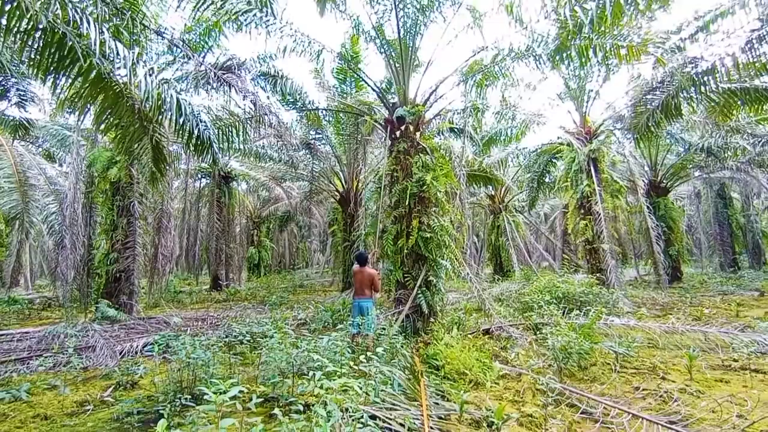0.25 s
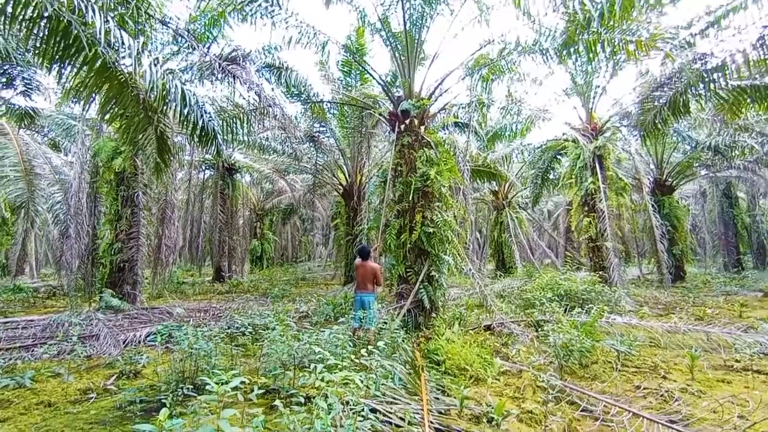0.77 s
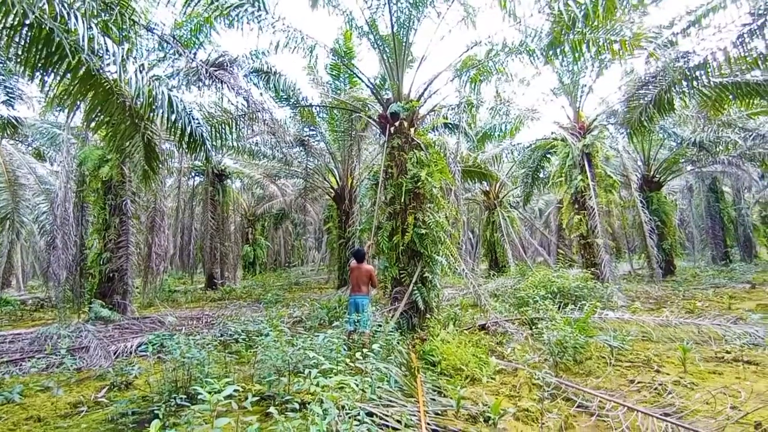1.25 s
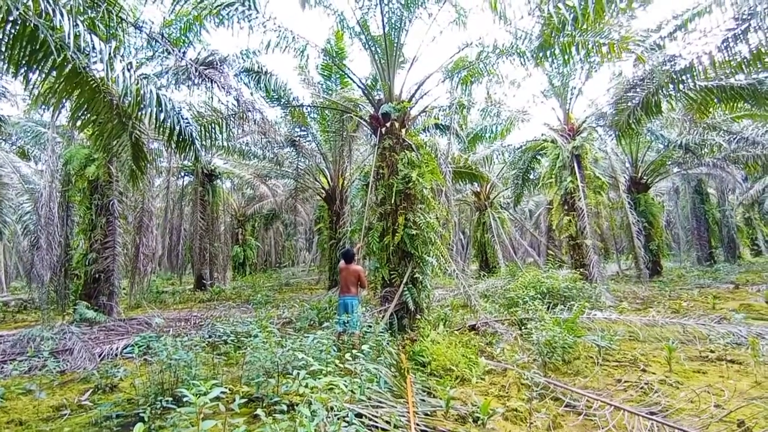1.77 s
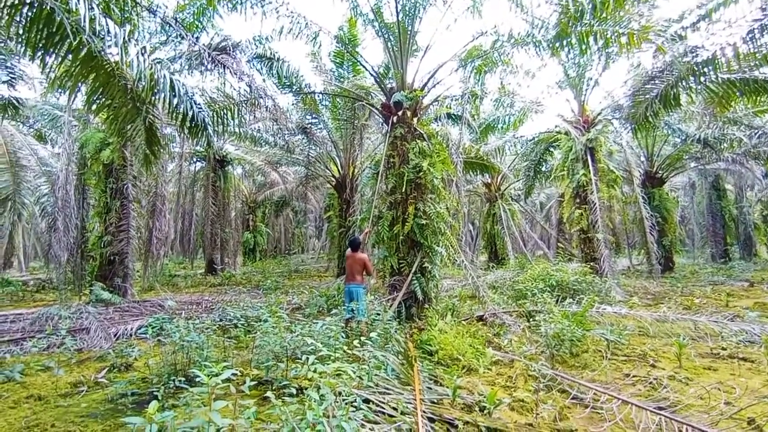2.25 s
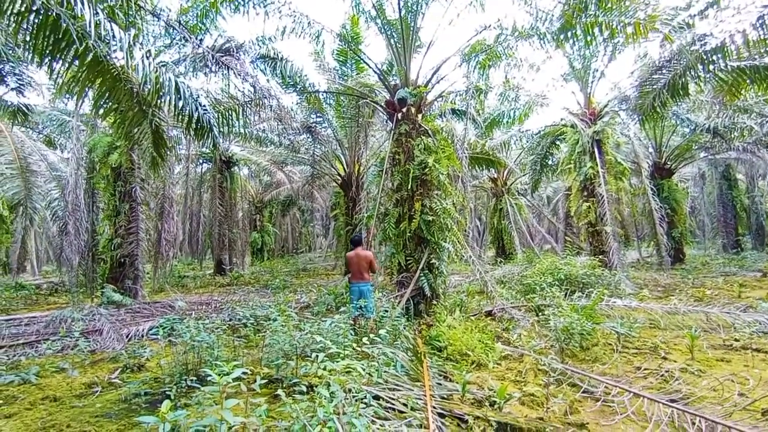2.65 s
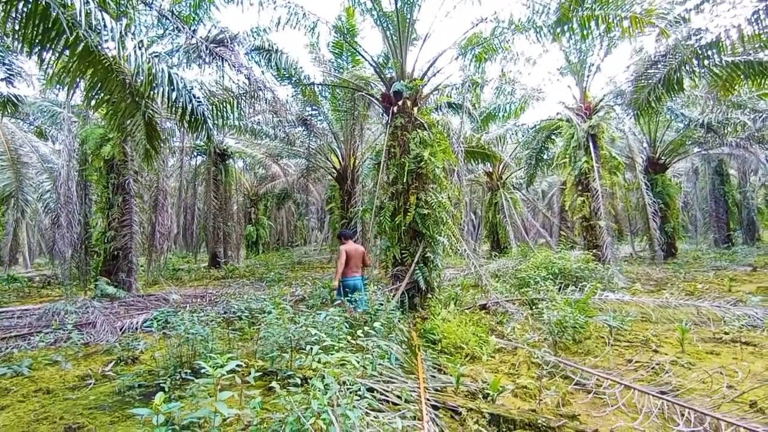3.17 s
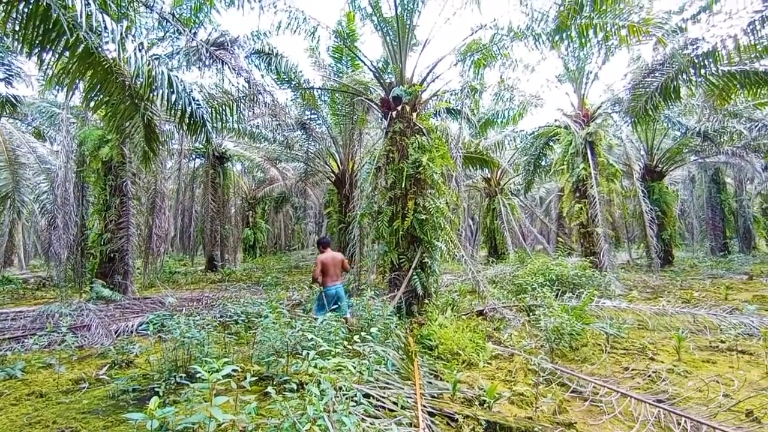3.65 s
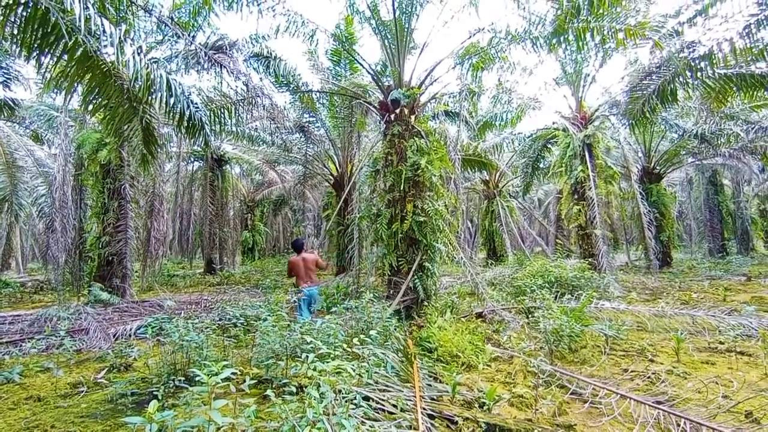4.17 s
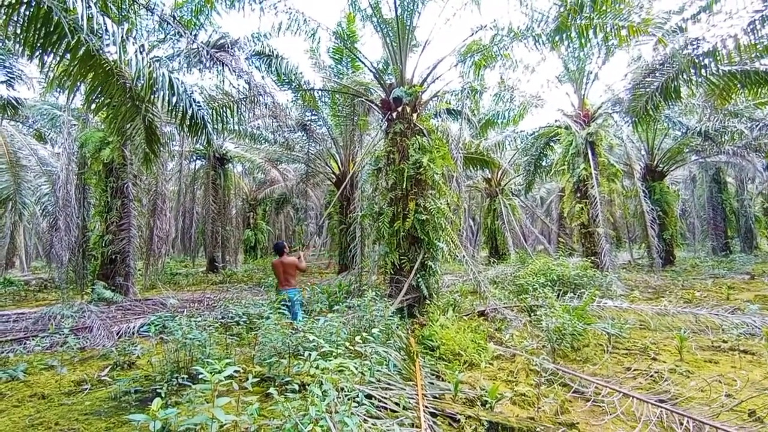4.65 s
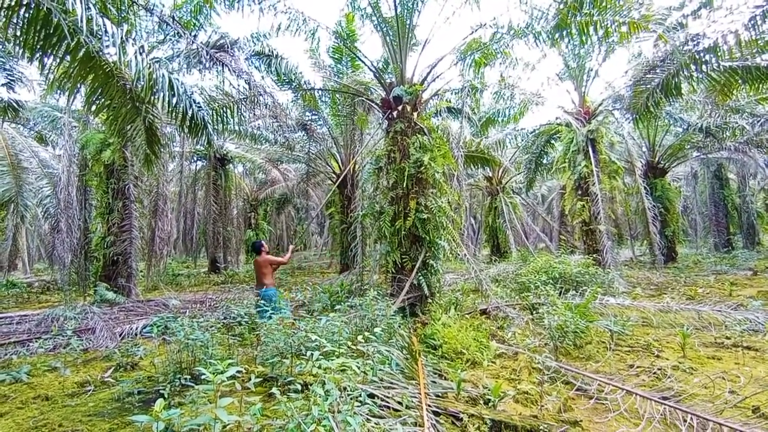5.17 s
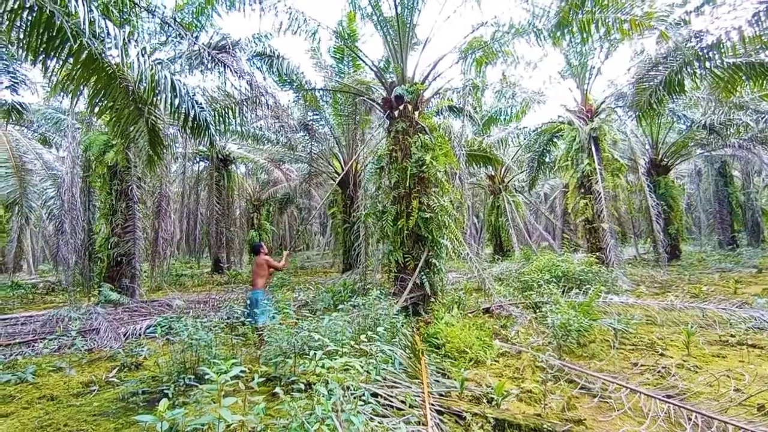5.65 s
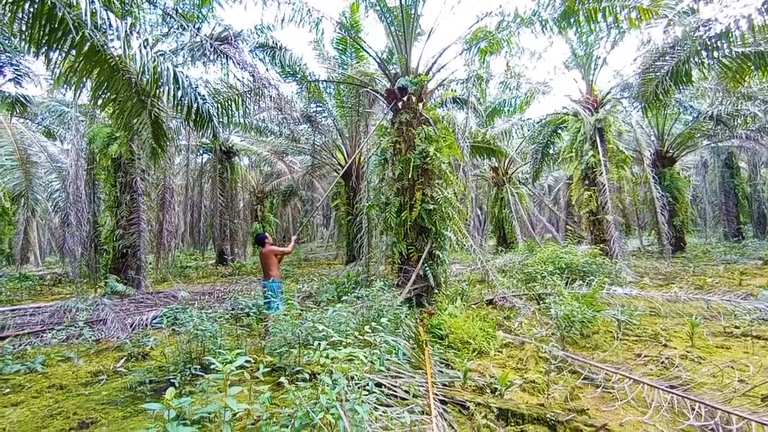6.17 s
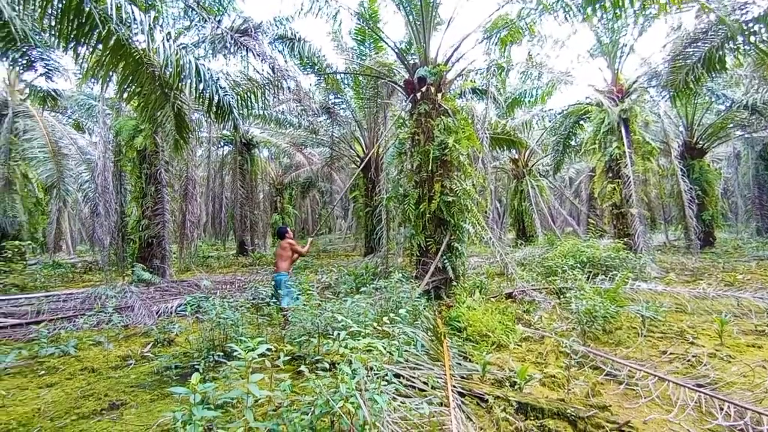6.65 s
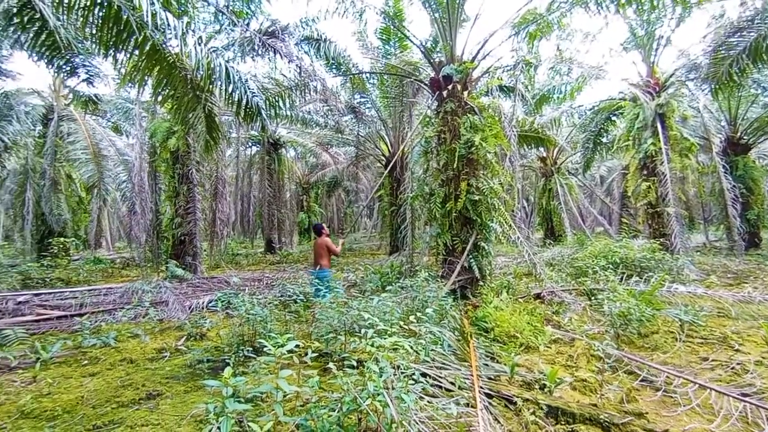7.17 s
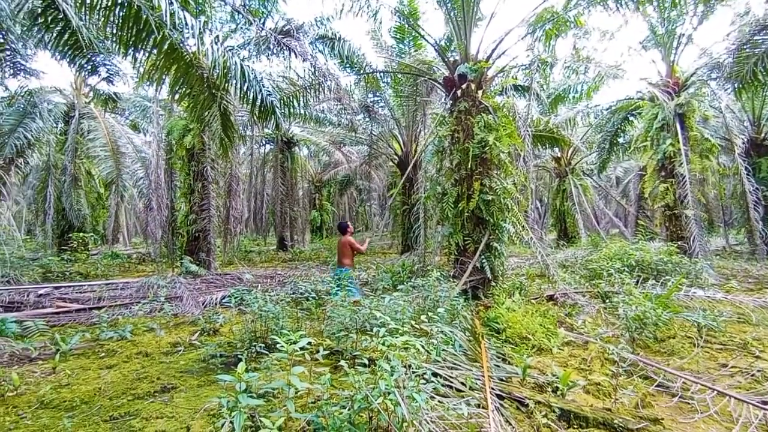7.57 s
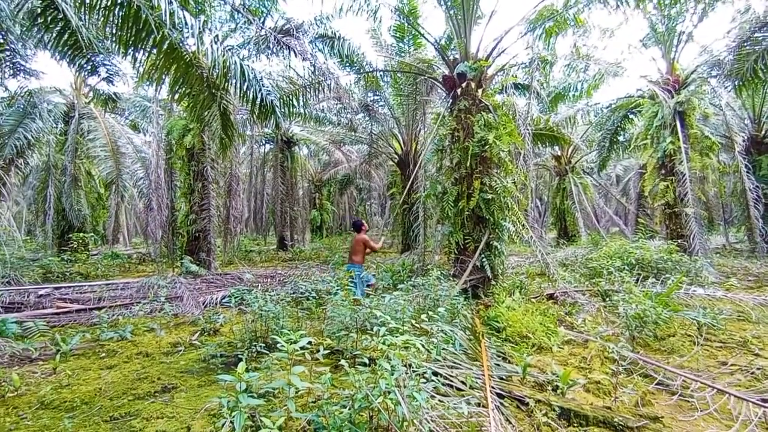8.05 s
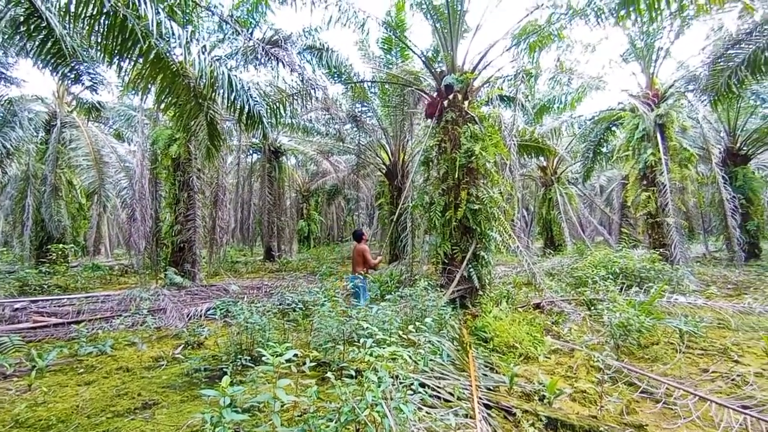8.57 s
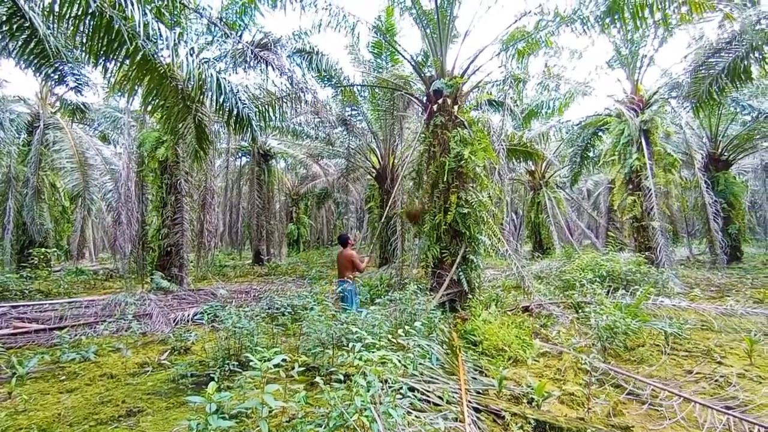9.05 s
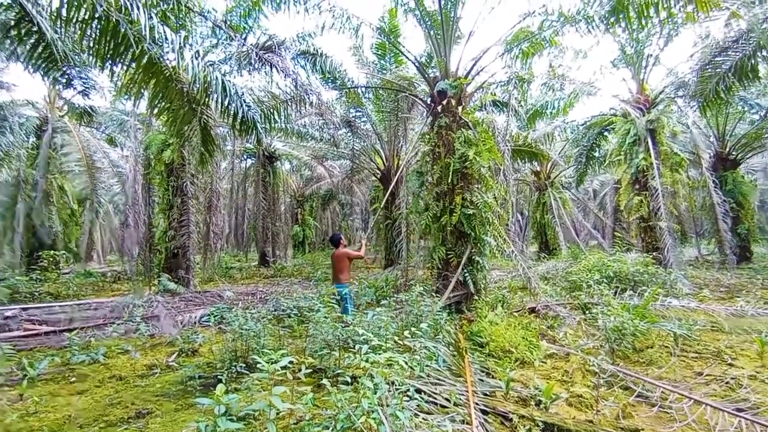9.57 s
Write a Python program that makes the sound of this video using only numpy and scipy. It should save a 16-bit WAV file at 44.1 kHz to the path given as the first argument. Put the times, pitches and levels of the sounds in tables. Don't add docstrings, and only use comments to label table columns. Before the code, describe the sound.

High, fast-throbbing insects and a faint distant rumble fill a palm plantation. Some metres from the stereo phone microphone, a long pole probes dry leaves with small ticks and taps. A frond breaks with a violent crack and long crackle, the pole then jerks and knocks woodily, leaves rustle, and a heavy bunch tumbles through foliage, landing dully near the end. The trunks return a short diffuse echo.

```python
import sys
import numpy as np
from scipy import signal
from scipy.fft import rfft, irfft
from scipy.io import wavfile
from scipy.ndimage import uniform_filter1d, map_coordinates

SR = 44100
rng = np.random.default_rng(int(sys.argv[2]) if len(sys.argv) > 2 else 0)


def boost(x):
    u = np.asarray(x, float) / 20
    return 10 ** u


def materialize(psi):
    bounded = np.clip(np.atleast_2d(psi).T, -1, 1)
    quanta = np.round(bounded * 32767).astype(np.int16)
    wavfile.write(sys.argv[1], SR, quanta)


N = 433042
TIME_S = np.arange(N) / SR
OPPOSED = np.array([[1], [-1]])


def level(x, db):
    return x * boost(db) / np.sqrt(np.mean(x ** 2))


def colour(x, points, size=512):
    hz, db = np.transpose(points)
    bins_hz = np.fft.rfftfreq(size, 1 / SR) + 1
    gain = boost(np.interp(np.log(bins_hz), np.log(hz), db))
    cep = irfft(np.log(gain))
    cep[1:size // 2] *= 2
    cep[size // 2 + 1:] = 0
    taps = irfft(np.exp(rfft(cep)))
    taps = taps.reshape((1,) * (x.ndim - 1) + (-1,))
    return signal.fftconvolve(x, taps)[..., :x.shape[-1]]


def ring(x, hz, width):
    return signal.lfilter(*signal.iirpeak(hz, hz / width, fs=SR), x)


def body(x, modes):
    return sum((-1) ** k * boost(db) * ring(x, hz, width) for k, (hz, width, db) in enumerate(modes))


def band(hz, width):
    return ring(ring(rng.standard_normal((2, N)), hz, width), hz, width)


def walk(rate):
    k = int(SR / rate)
    held = np.repeat(rng.standard_normal(N // k + 1), k)
    return 0.95 * uniform_filter1d(uniform_filter1d(held, k), k)[:N]


def fade(t60, size=4096):
    return 1000. ** (-np.arange(size) / SR / t60)


def grains(count, spread_db, tail_s, apart):
    at, size = rng.random((2, count))
    power = boost(-2 * spread_db * np.log(size + .004))
    hits = np.bincount((at * (N - 1)).astype(int), power, N)
    puff = np.sqrt(signal.lfilter([1], [1, -np.exp(-1 / (tail_s * SR))], hits))
    mid, side = rng.standard_normal((2, N))
    return puff * (mid + apart * side * OPPOSED)


def breaking(t60):
    splinters = rng.standard_normal((2, 4096)) * fade(t60)
    splinters[[0, 1], rng.integers(0, 2, 2)] = 5.5
    return splinters


def strokes(table):
    t = np.arange(0, N / SR, .002)
    power = np.zeros((2, len(t)))
    for s, rise, fall, db, second_db in table:
        away = np.where(t < s, (s - t) / rise, (t - s) / fall)
        shape = boost(db - 20 * away)
        power += shape ** 2 * boost(np.array([[0], [2 * second_db]]))
    return np.array([np.interp(TIME_S, t, np.sqrt(layer)) for layer in power])


def sides(pan_db):
    return boost(np.array([pan_db, -pan_db]) / 2)


def add(out, s, sound, db):
    i = int(s * SR)
    sound = sound[..., :N - i]
    out[:, i:i + sound.shape[-1]] += boost(db) * sound / np.abs(sound).max()


# time_s, left_minus_right_db, left_port_early_ms
BEARING = [
    (0.0, 0, 0.02),
    (2.9, 0, 0.0098),
    (3.72, 0.5, 0.059),
    (5.55, 1, 0.1),
    (5.66, 0.5, .05),
    (6.3, 1, 0.083),
    (7.2, 0, -0.025),
    (8.7, 0, -0.035),
    (9.82, 0.5, -0.022),
]


def bearing(s, axis):
    table = np.transpose(BEARING)
    return np.interp(s, table[0], table[axis])


# pitch_hz, level_db
LEAF = [(2940, -20.5), (5000, -14.5), (7390, -8), (8080, -5), (8840, -2.5), (9330, 2.5), (10500, 2),
        (11800, -4), (15100, -10.5), (16000, -26), (16300, -107.5)]
# pitch_hz, level_db
FROND = [(150, -60), (700, -34), (1300, -12.5), (2000, -5.5), (3400, 0), (5500, -1.5), (7500, -2.5),
         (10000, 1), (16000, -36.5)]
# time_s, level_db
STIR = [(0, -66), (.5, -59.5), (1.34, -57.5), (1.85, -63.5), (2.4, -70.5), (3.36, -60), (4.9, -64.5),
        (5.58, -71), (6.05, -74), (6.5, -60.5), (8.3, -66), (9.82, -51)]
# loudest_s, rise_s and fall_s (over 20 dB), level_db, frond_body_db (against level)
SWEEPS = [(.24, 0.038, 0.061, -44.5, -4), (3.56, 0.24, 0.28, -47.5, -9), (3.66, 0.081, .2, -44.5, -12),
          (3.75, 0.15, 0.27, -39.5, -11.5), (3.84, 0.11, 0.35, -35, -10.5), (4.04, 0.11, 0.52, -47, -9),
          (4.4, .3, 0.91, -54, -9), (2.83, .15, 0.19, -63, -12), (9.28, 0.061, .2, -61, -6),
          (9.43, 0.14, 0.16, -36.5, -9), (3.95, 0.037, 0.095, -35, 1.5), (4.27, 0.061, 0.14, -40, -11),
          (4.54, .2, 0.18, -62, -15), (4.97, .04, 0.13, -58, -4.5), (5.69, 0.08, 0.11, -47, -5.5),
          (6.23, 0.2, 0.3, -57, -3.5), (6.56, 0.072, 0.64, -64, 3), (6.73, 0.019, 0.15, -39.5, -7.5),
          (7.52, 0.36, 1, -54.5, -6.5), (8.15, 0.21, 0.29, -55.5, -5.5), (8.5, 0.16, 0.65, -48.5, -7),
          (9.0, 0.19, 1, -45, -5), (9.52, 0.62, 0.34, -37, -7), (9.82, 0.32, 0.18, -49, -13)]


def leaflets():
    stir = boost(np.interp(TIME_S, *np.transpose(STIR)))
    stir_layers = stir * boost(np.array([[0], [-6]]))
    bright, dull = np.hypot(strokes(SWEEPS), stir_layers)
    tips = grains(count=8000, spread_db=1.9, tail_s=.0012, apart=.7)
    frond = grains(count=5000, spread_db=1.8, tail_s=.0018, apart=.7)
    tips = level(colour(tips, LEAF), 0.63)
    frond = level(colour(frond, FROND), 1.8)
    return sides(bearing(TIME_S, axis=1)) * (bright * tips + dull * frond)


# start_s, peak_db, body_db (against peak)
WORK_SNAPS = [(0.206, -41, -12), (0.2266, -46, 1), (0.421, -36, -3.5), (0.4533, -37, -18),
              (0.613, -42, -1.5), (0.972, -42, 0.5), (1.1264, -38.5, -15), (1.384, -38, -30),
              (1.4428, -33.5, -39), (1.603, -39, -16), (1.788, -38.5, -24), (1.94, -43, -34),
              (1.992, -41.5, -32), (6.2160, -32.5, -19), (6.4283, -41, -31), (6.5535, -43, -12),
              (6.58, -39, -15), (6.717, -35, -10), (6.7317, -31, -17), (6.8774, -34, -18),
              (7.423, -34, -23), (7.4692, -40, -12), (7.5194, -41.5, -2), (7.551, -49, 5),
              (7.6154, -42, 3.5), (7.753, -45, -26), (8.1252, -42.5, -10), (8.4607, -31.5, -19),
              (8.556, -27.5, -39)]
# start_s, peak_db, body_db (against peak)
FALL_SNAPS = [(3.3628, -48, -19), (3.49, -33.5, -12), (3.512, -36, -16), (3.5573, -28.5, -22),
              (3.582, -26, -14), (3.6515, -25, -13), (3.693, -27.5, -19), (3.746, -30, -15),
              (3.8193, -24, -34), (3.9065, -40, -23), (3.929, -10, -20), (4.037, -22, -18),
              (4.152, -54, -21), (4.2372, -26.5, -16), (4.5186, -43, -20), (4.5377, -37, -17),
              (8.9393, -40, -5), (8.996, -33.5, -35), (9.1, -33, -18), (9.3028, -57, -19),
              (9.3478, -31, -23.5), (9.392, -32, -18), (9.42, -28, -26), (9.758, -35, -12),
              (9.7986, -28, -9)]
WORK_SHAKE_DB, FALL_SHAKE_DB = -6, -7.5
PAN_SCATTER_DB = 1.2


def snaps():
    out = np.zeros((2, N))
    rows = [(*row, WORK_SHAKE_DB) for row in WORK_SNAPS] + [(*row, FALL_SHAKE_DB) for row in FALL_SNAPS]
    for s, db, body_db, shake_db in rows:
        shake = rng.standard_normal((2, 4096)) * fade(.15)
        puff = breaking(.008) + boost(shake_db) * shake
        pan_db = 1.6 + bearing(s, axis=1) + PAN_SCATTER_DB * rng.standard_normal()
        puff = puff * sides(pan_db)[:, None]
        add(out, s, colour(puff, LEAF), db + 4.0)
        add(out, s, colour(puff, FROND), db + body_db + 11.0)
    return out


# start_s, peak_db, pitch_hz
TICKS = [(0.3804, -50, 9210), (2.4688, -54, 7110), (2.592, -44, 9700), (3.4471, -33, 9030),
         (3.4798, -30, 9250), (3.5563, -32, 9790), (3.6935, -18, 10600), (3.7673, -27, 9970),
         (3.7844, -24, 9400), (3.7974, -26, 8900), (3.8177, -25, 10300), (3.8304, -24, 9770),
         (3.8394, -19, 9510), (3.8454, -17, 9420), (3.8714, -23, 10400), (3.906, -17, 9590),
         (3.9283, -14, 10700), (4.036, -27, 10100), (4.1525, -39, 10500), (4.2434, -30, 10500),
         (4.4514, -44, 9180), (6.0866, -43, 9860), (6.2134, -18, 10800), (6.6644, -47, 9700),
         (9.8144, -31, 9430)]
# start_s, peak_db, pitch_hz
CRACKS = [(0.044, -48, 1560), (0.421, -35, 1230), (0.611, -37, 3010), (3.528, -38, 3000),
          (3.831, -32, 4030), (3.928, -13, 4660), (4.036, -43, 4770), (4.193, -35, 4030),
          (4.356, -41, 1720), (4.396, -42, 1180), (4.473, -47, 697), (4.526, -31.5, 2860),
          (6.089, -41.5, 3940), (6.163, -44, 1390), (6.214, -30, 1710), (6.245, -32, 1540),
          (6.311, -35, 1720), (6.507, -48, 1730), (6.572, -32, 3070), (6.768, -27, 1190),
          (6.865, -47, 1610), (6.876, -30, 1710), (8.807, -33, 681), (8.909, -50, 649), (8.93, -33, 1640),
          (9.203, -38.5, 710), (9.279, -24.5, 2910), (9.303, -42, 3400), (9.425, -42, 614),
          (9.472, -34, 1210), (9.484, -35, 657), (9.497, -20, 3120), (9.515, -29, 606), (9.554, -33, 1540),
          (9.581, -32, 673), (9.602, -31.5, 501), (9.646, -29.5, 1990), (9.757, -33, 3410),
          (9.797, -37, 3750), (9.814, -35, 3720),
          (0.206, -46, 1150), (1.125, -54, 571), (1.162, -57, 501), (1.228, -54, 635), (1.253, -48, 1050),
         (1.303, -50, 1500), (1.349, -49, 1270), (1.407, -46, 557), (1.435, -37, 2370), (1.508, -53, 719),
         (1.683, -42.5, 536), (1.787, -50, 3750), (1.843, -50, 1030), (1.94, -46, 1600), (2.108, -45, 1240),
         (2.165, -48, 1030), (2.281, -65, 2980), (2.318, -57, 616), (2.48, -51.5, 657), (2.533, -57, 1530),
         (2.732, -56, 1040), (2.78, -54, 501), (3.067, -54, 514), (3.17, -57, 721), (3.233, -56, 2810),
         (4.952, -59, 732), (5.625, -55, 1130), (5.644, -48, 668), (6.821, -34, 1600), (7.473, -31, 1570),
         (7.518, -31, 1590), (7.552, -26.5, 1630), (7.615, -27, 3530), (8.12, -35, 1560)]
TICK_T60_S, TICK_WIDTH, TICK_DB = .004, 0.12, -1.5
SPLIT_T60_S, SPLIT_WIDTH, SPLIT_DB = 0.013, .9, -1


def cracks():
    out = np.zeros((2, N))
    for s, db, hz in TICKS:
        rib = ring(breaking(TICK_T60_S), hz, TICK_WIDTH * hz)
        add(out, s, ring(rib, hz, 0.54 * hz), db + TICK_DB)
    for s, db, hz in CRACKS:
        stem = ring(breaking(SPLIT_T60_S), hz, SPLIT_WIDTH * hz)
        add(out, s, ring(stem, hz, 4.8 * hz), db + SPLIT_DB)
    return out


# pitch_hz, width_hz, level_db
POLE = [(664, 174, -4), (1040, 120, -2.5), (1170, 164, -2.5), (1580, 87, -1), (1720, 53, -1.5),
        (2310, 280, -6.5), (2920, 330, -10), (3630, 47, -8.5)]
# pitch_hz, width_hz, level_db
TRUNK = [(235, 120, -6), (174, 265, -10), (377, 256, -1.5), (471, 12, -8.5)]
# loudest_s, rise_s and fall_s (over 20 dB), level_db, trunk_db (against level)
DRAGS = [(.05, 0.039, 0.1, -63, 0), (.24, 0.036, 0.034, -36.5, -11.5), (.44, .3, 1, -65.5, 1.5),
         (1.04, 0.1, 0.02, -50.5, -4), (1.42, 3, 0.48, -63, 5.5), (3.91, 4.3, 0.17, -70.5, 2.5),
         (4.05, 0.13, 2, -77.5, 10.5), (5.69, 0.054, 0.047, -37.5, -3), (5.77, 0.07, 0.11, -52.5, 2.5),
         (6.23, 0.11, 0.14, -50, -1.5), (6.69, 0.41, .05, -63.5, 3.5), (6.722, 0.021, 0.066, -32.5, -22),
         (6.745, .03, 0.047, -35.5, -11), (6.765, 0.038, 0.04, -35, -0.5), (6.89, 0.2, 0.044, -48, -1),
         (7.52, 0.18, 0.25, -49, -0.5), (7.66, .05, 1.1, -64, -0.5), (8.12, 0.19, 0.1, -59, 8.5),
         (9.35, 1.19, 0.67, -49, 0), (9.49, 0.16, 0.14, -40, 3), (9.68, 0.34, 0.85, -56.5, 5)]


def scrape():
    drag, weight = strokes(DRAGS)
    slips = grains(count=5000, spread_db=3.5, tail_s=0.0015, apart=0.29)
    shakes = grains(count=2500, spread_db=4.0, tail_s=0.0059, apart=0.11)
    pole = body(level(slips, 11.1) * drag, POLE)
    trunk = body(level(shakes, 14.8) * weight, TRUNK)
    return pole + ring(trunk, 220, 680)


# start_s, peak_db, pitch_hz
TAPS = [(0.211, -49, 1250), (.233, -40, 1580), (.324, -57, 1600), (.38, -50, 1110), (.422, -44, 2270),
        (.453, -47, 2430), (.558, -48, 620), (.612, -42.5, 3160), (0.734, -55, 1140), (.919, -46.5, 2090),
        (.971, -41.5, 2820), (1.014, -42.5, 594), (1.036, -45, 1740), (1.162, -47, 486), (1.255, -55, 920),
        (1.323, -39, 1380), (1.349, -54, 1270), (1.433, -39.5, 635), (1.51, -54, 680), (1.544, -43.5, 1450),
        (1.683, -43, 1500), (1.758, -44.5, 1560), (1.847, -55, 1280), (1.9, -49.5, 1500),
        (1.938, -42.5, 1550), (2.036, -51, 1170), (2.075, -56, 1060), (2.126, -45.5, 1040),
        (2.218, -56.5, 700), (3.067, -59, 514)]
# start_s, peak_db
JERKS = [(5.681, -39), (5.697, -42), (5.758, -47), (5.784, -45.5), (5.82, -53), (5.842, -49), (5.873, -57),
         (5.89, -54), (6.163, -38), (6.214, -35), (6.247, -33), (6.292, -48), (6.313, -44.5),
         (6.362, -52.5), (6.506, -40), (6.819, -42), (6.851, -44), (6.88, -35), (7.473, -29),
         (7.517, -31.5), (7.552, -29), (7.616, -33), (7.803, -49.5), (8.121, -39.5), (8.828, -40)]
# start_s, peak_db, pitch_hz
STRIKES = [(3.529, -39, 3100), (3.556, -45.5, 1950), (3.929, -27, 2760), (3.928, -32, 787),
           (4.236, -49, 664), (4.357, -47.5, 1720), (4.396, -40.5, 1028), (4.526, -44.5, 2940),
           (4.952, -53.5, 730), (5.125, -58, 1600), (6.556, -50, 2920), (6.579, -39.5, 2360),
           (6.693, -56, 606), (6.726, -30.5, 1040), (7.1, -46, 3120), (8.21, -55, 1060), (8.473, -39, 4200),
           (8.678, -49, 3650), (8.758, -43.5, 1070), (8.807, -38.5, 670), (9.214, -46, 710),
           (9.279, -35, 2950), (9.326, -60, 2350), (9.425, -35, 640), (9.472, -39, 1200),
           (9.497, -34, 1940), (9.554, -30, 590), (9.582, -34.5, 646), (9.646, -43, 1980),
           (9.795, -44.5, 704)]
JERK_HZ, JERK_T60_S, TAP_T60_S, STRIKE_T60_S = 1570, 0.041, 0.054, 0.036
CRACK_DB = -5


def knocks():
    out = np.zeros((2, N))
    hits = [(*row, TAP_T60_S) for row in TAPS]
    hits += [(*row, JERK_HZ, JERK_T60_S) for row in JERKS]
    hits += [(*row, STRIKE_T60_S) for row in STRIKES]
    for s, db, hz, t60 in hits:
        bite = fade(t60) - 0.59 * fade(0.01)
        mid, side = rng.standard_normal((2, 4096)) * bite
        contact = mid + 0.28 * side * OPPOSED
        stem = ring(contact, hz, 0.13 * hz)
        pole = boost(-4.5) * body(contact, POLE)
        trunk = boost(-9.5) * body(contact, TRUNK)
        add(out, s, stem + pole + trunk, db)
        add(out, s, colour(breaking(.012), FROND), db + CRACK_DB)
    return out


# start_s, peak_db, pitch_hz, t60_s
RINGS = [(.698, -55, 310, .06), (.728, -51, 310, .05), (.732, -56, 1500, .03), (1.128, -54, 315, .06),
         (1.227, -55, 431, .05), (5.676, -42, 1547, .08), (5.757, -50, 1603, .08), (5.783, -49, 1560, .06),
         (5.841, -55, 1560, 0.041), (6.174, -44.5, 1100, 0.033), (6.222, -46, 322, .06),
         (6.311, -48, 1600, .04), (7.468, -42, 3550, .03), (7.6155, -40, 3530, .05), (6.69, -53, 600, .05),
         (6.714, -38, 1044, .12), (6.736, -40, 1044, .1), (6.818, -38.5, 1530, 0.042),
         (6.866, -48, 1540, .05), (6.879, -35.5, 1530, 0.045), (7.47, -37.5, 1530, .05),
         (7.516, -41, 1545, .05), (3.9068, -24, 9590, .008), (3.9286, -9, 9420, .01),
         (8.995, -32, 9640, .006), (9.3916, -26, 9940, .008), (9.4205, -25, 10100, .008),
         (9.7984, -30, 6030, .006), (.6115, -40, 3050, .01), (.206, -49, 2600, .03), (.232, -42, 2900, .04),
         (1.434, -41, 640, .03), (6.2455, -39, 1090, 0.032), (7.472, -42, 1020, 0.064),
         (7.518, -45, 1020, .06), (8.806, -39, 680, 0.034), (1.684, -48, 1484, .04),
         (9.2788, -34, 5000, .006), (3.5565, -33, 9770, .008)]
RING_PAIR, RING_PAIR_DB = 1.12, -4
RING_BITE = .12


def rings():
    out, t = np.zeros((2, N)), np.arange(4096) / SR
    for s, db, hz, t60 in RINGS:
        first = np.sin(2 * np.pi * hz * t)
        second = boost(RING_PAIR_DB) * np.sin(2 * np.pi * RING_PAIR * hz * t)
        swell = fade(t60) - fade(RING_BITE * t60)
        add(out, s, (first + second) * swell, db)
    return out


# start_s, peak_db, pitch_hz
BUMPS = [(0.557, -46.5, 475), (0.57, -40.5, 253), (1.011, -46, 520), (1.017, -38.5, 350), (1.031, -53, 227),
         (1.16, -50.5, 326), (1.354, -50.5, 257), (1.68, -52.5, 540), (3.924, -57, 157),
         (5.634, -49.5, 266), (6.158, -52, 290), (6.212, -45.5, 312), (6.76, -33.5, 221), (7.015, -53, 224),
         (7.466, -43.5, 408), (7.523, -43, 225), (8.713, -53, 278), (8.803, -42, 527), (9.426, -37.5, 214),
         (9.476, -34.5, 340), (9.551, -56, 594)]
# start_s, peak_db
GROUND = [
    (9.43, -54),
    (9.49, -43),
]
BUMP_T60_S = 0.15


def bumps():
    out = np.zeros((2, N))
    for s, db, hz in BUMPS:
        push = rng.standard_normal(4096) * fade(0.12 * BUMP_T60_S)
        wood = ring(push, hz, 4.0 / BUMP_T60_S) + boost(-12) * body(push, TRUNK)
        add(out, s, ring(wood, hz, 1.2 * hz), db)
    for s, db in GROUND:
        add(out, s, ring(rng.standard_normal(8192) * fade(0.34, size=8192), 50, 35), db)
    return out


GROVE_T60_S, GROVE_DB = .2, -11


def grove_echo(work):
    trunks = rng.standard_normal((2, 16384)) * fade(GROVE_T60_S, size=16384)
    trunks = ring(trunks, 5800, 10000)
    trunks[:, :300] = 0
    trunks = trunks / np.sqrt(np.sum(trunks ** 2) / 2)
    return boost(GROVE_DB) * signal.fftconvolve(work, trunks, axes=1)[:, :N]


# pitch_hz, width_hz, level_db
KATYDID = [
    (7115, 420, -69.5),
    (14250, 900, -73.5),
]
CHIRPS_PER_S, WING_STROKES, CHIRP_SHARE = 20.6, 4, .75


def katydid():
    chirp = np.cumsum(CHIRPS_PER_S * (1 + .012 * walk(1.5))) / SR
    wing = np.sin(np.pi * WING_STROKES * chirp) ** 2 * (chirp % 1 < CHIRP_SHARE)
    return sum(level(band(hz, width) * wing, db) for hz, width, db in KATYDID)


# pitch_hz, width_hz, level_db, throbs_per_s
INSECTS = [
    (7110, 520, -68.5, 72),
    (9090, 1020, -62, 129),
]


def insects():
    out = 0
    for hz, width, db, rate in INSECTS:
        throb = 1 + .18 * np.sin(2 * np.pi * rate * TIME_S + 2.5 * walk(6))
        drift = boost(0.15 * walk(0.23) + 0.29 * walk(26))
        out = out + level(band(hz, width) * throb * drift, db)
    return out


# start_s, length_s, from_hz, to_hz, peak_db
BIRD = [
    (2.38, .09, 2300, 2700, -76),
    (2.73, .1, 2050, 2250, -79),
    (3.08, .1, 1600, 1700, -77),
    (3.36, .1, 1640, 1640, -83),
    (4.7, .2, 1700, 1640, -81),
    (5.2, .16, 2120, 2100, -79),
    (5.36, .13, 2250, 2170, -77),
]
BIRD_WAVER, BIRD_FLUTTER_DB = .03, 8


def bird():
    out = np.zeros((2, N))
    waver = 1 + BIRD_WAVER * walk(40)
    flutter = boost(BIRD_FLUTTER_DB * walk(30))
    for s, length, from_hz, to_hz, db in BIRD:
        hz = np.linspace(from_hz, to_hz, int(length * SR))
        hz = hz * waver[int(s * SR):][:len(hz)]
        add(out, s, np.hanning(len(hz)) * np.sin(2 * np.pi * np.cumsum(hz) / SR), db)
    return out * flutter


# pitch_hz, level_db
FAR = [(15, -9), (25, -64), (43, -9), (162, 3), (921, -20), (1540, -22), (1870, -22.5), (2510, -22),
       (5670, -26), (7040, -17), (8070, -19.5), (9240, -7.5), (12800, -27.5), (14300, -16), (16300, -44)]
# pitch_hz, level_db
FAR_SIDE = [(60, -1), (110, -2.5), (200, -5.5), (380, -1), (700, -2.5), (1290, -1), (2380, 0.5), (4400, 2),
            (8120, 1.5), (15000, -1)]
FAR_DB = -64


def far():
    mid, side = rng.standard_normal((2, N))
    air = colour(mid + colour(side, FAR_SIDE) * OPPOSED, FAR, size=8192)
    return level(air * boost(.7 * walk(2.5)), FAR_DB)


def scene():
    work = leaflets() + snaps() + cracks() + scrape() + knocks() + rings() + bumps()
    early = SR / 1000 * bearing(TIME_S, axis=2)
    work[0] = map_coordinates(work[0], [np.arange(N) + early], mode="mirror")
    return work + grove_echo(work) + katydid() + insects() + bird() + far()


def low_pass(x):
    return signal.sosfilt(signal.butter(12, 16480, fs=SR, output="sos"), x)


PORT_LOW_HZ, PORT_TOP_HZ = 40, 15450


def record(dry):
    low_cut = signal.butter(2, PORT_LOW_HZ, "high", fs=SR, output="sos")
    top_cut = signal.ellip(8, .2, 50, PORT_TOP_HZ, fs=SR, output="sos")
    port = signal.sosfilt(top_cut, signal.sosfilt(low_cut, dry))
    return low_pass(port)


dry = scene()
out = record(dry)
materialize(out)
```